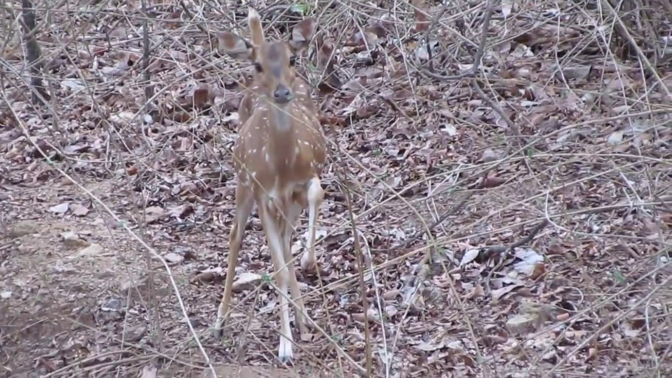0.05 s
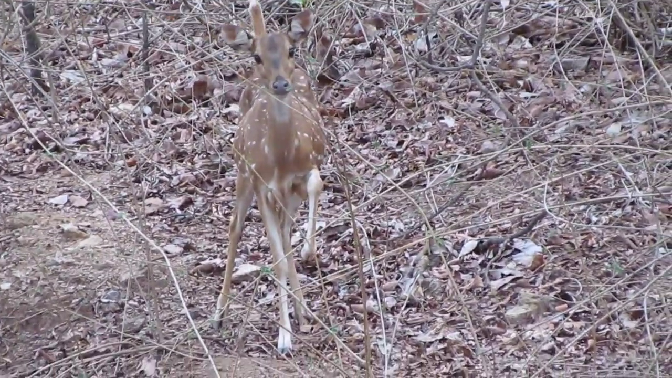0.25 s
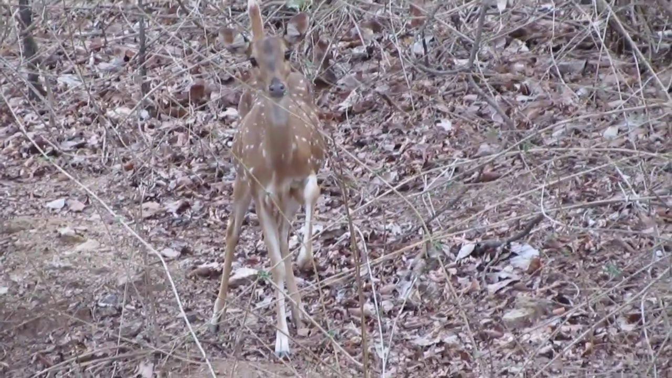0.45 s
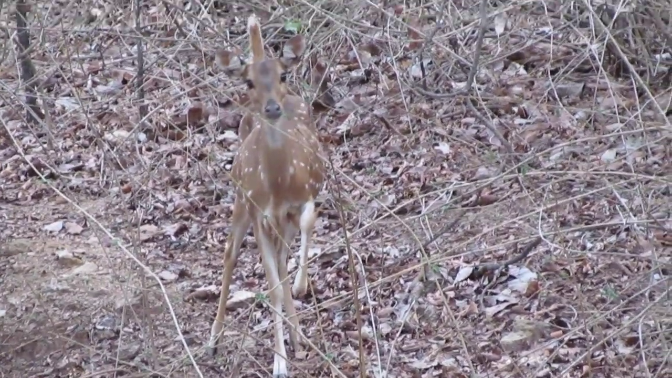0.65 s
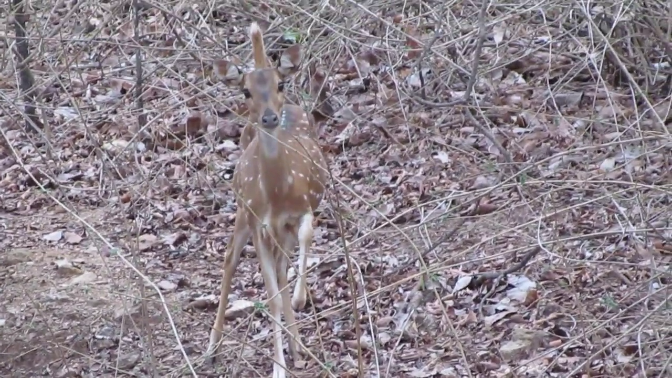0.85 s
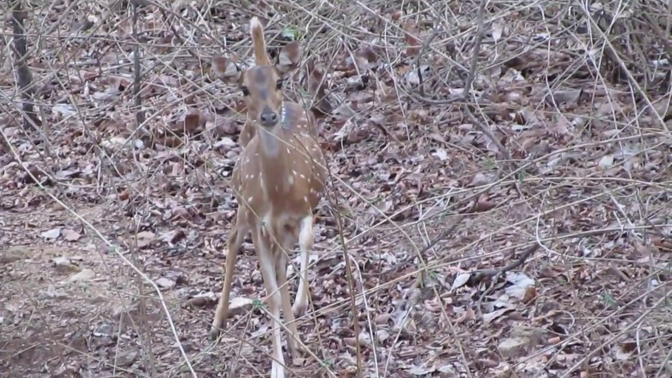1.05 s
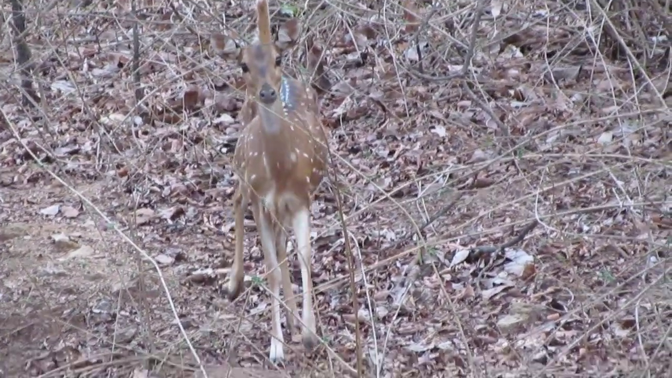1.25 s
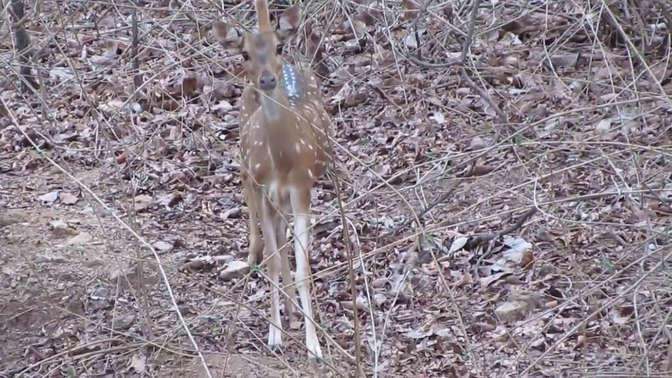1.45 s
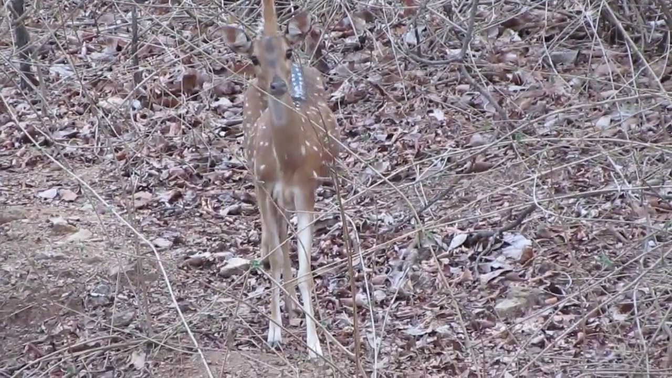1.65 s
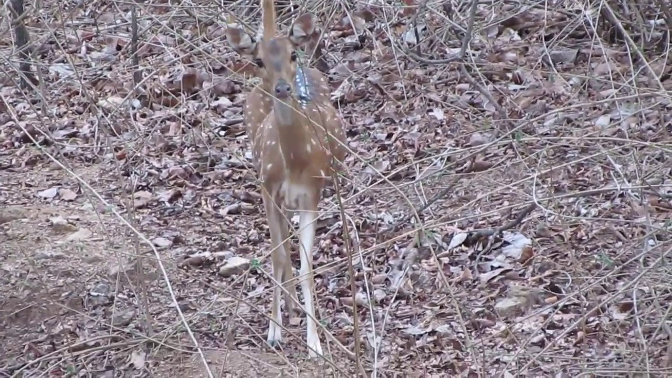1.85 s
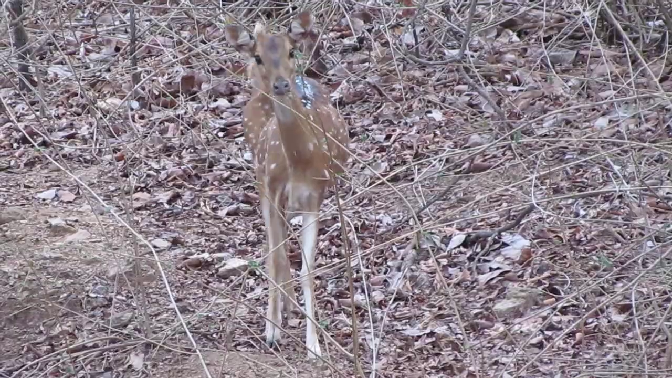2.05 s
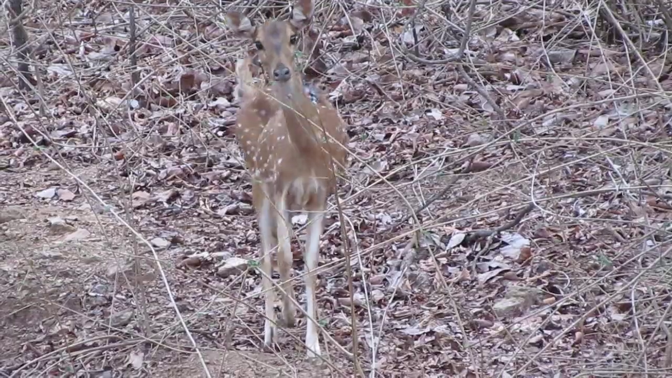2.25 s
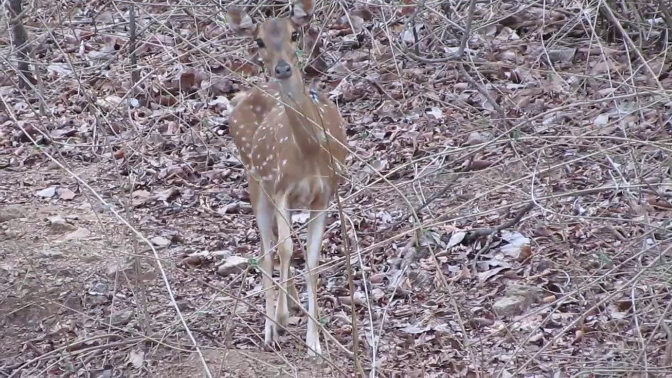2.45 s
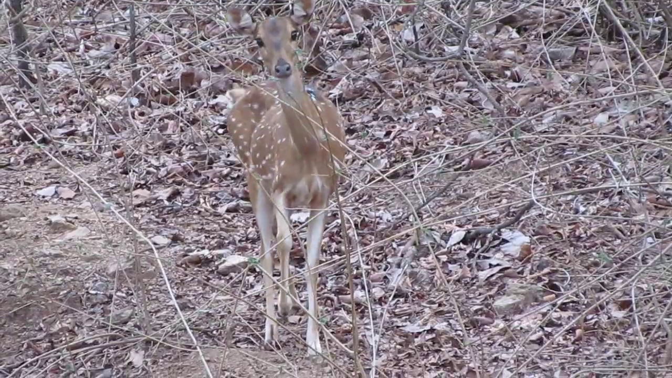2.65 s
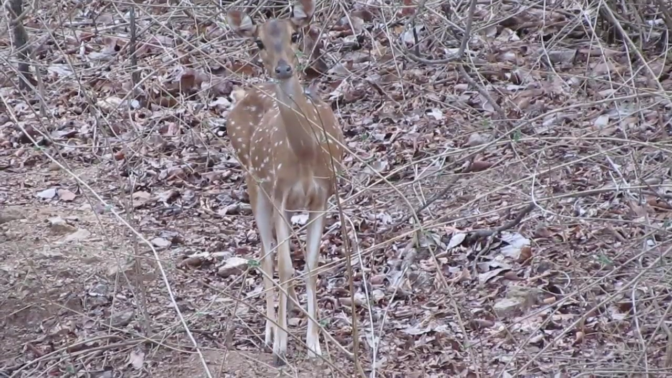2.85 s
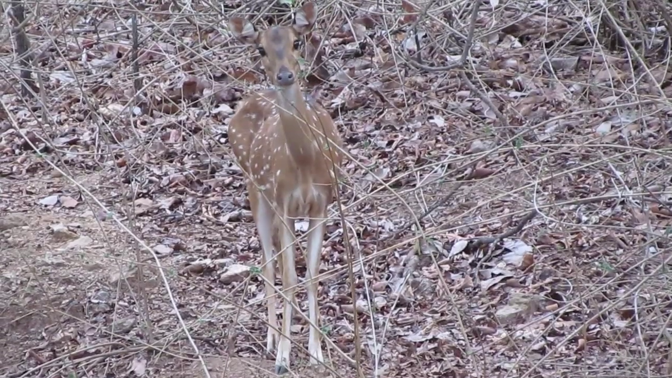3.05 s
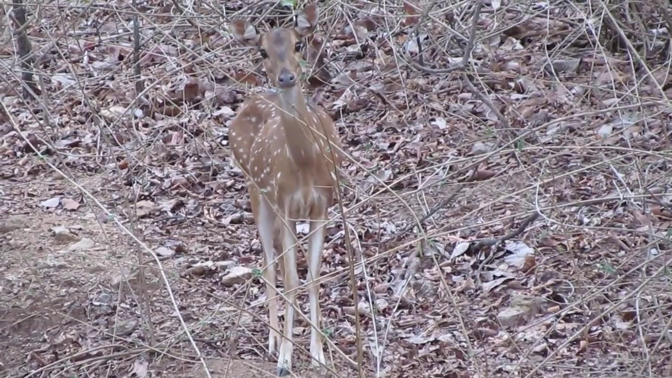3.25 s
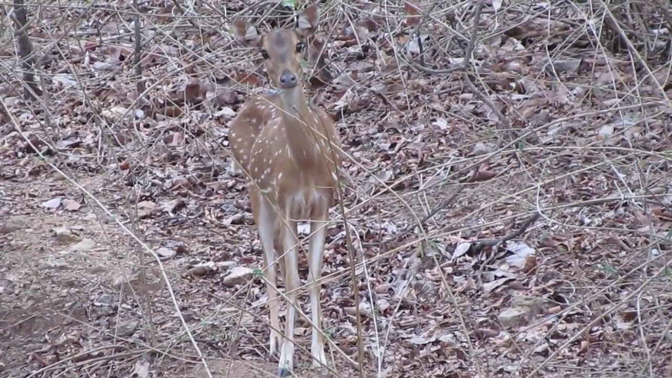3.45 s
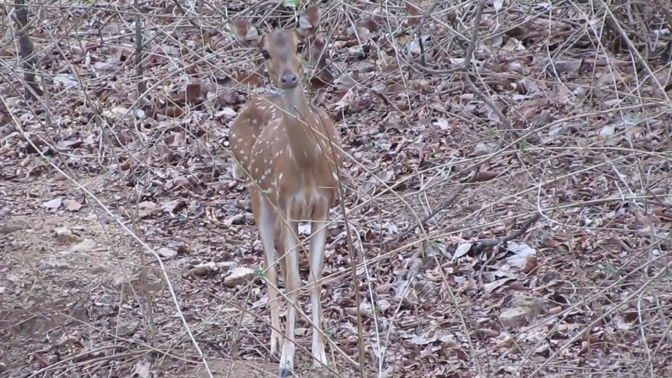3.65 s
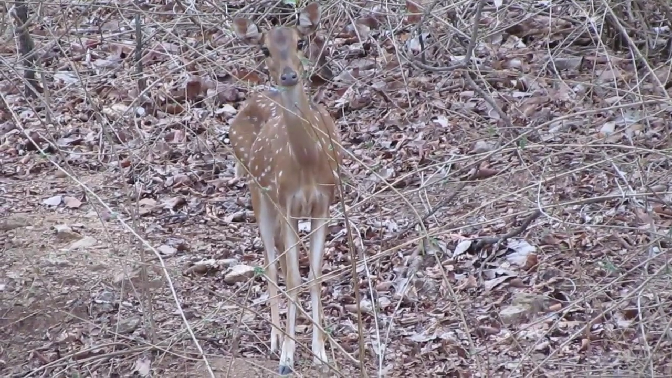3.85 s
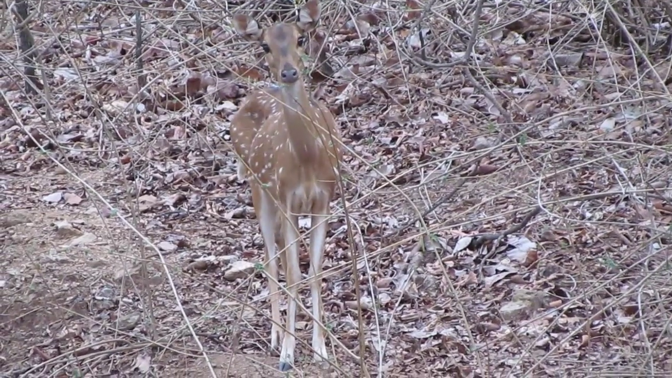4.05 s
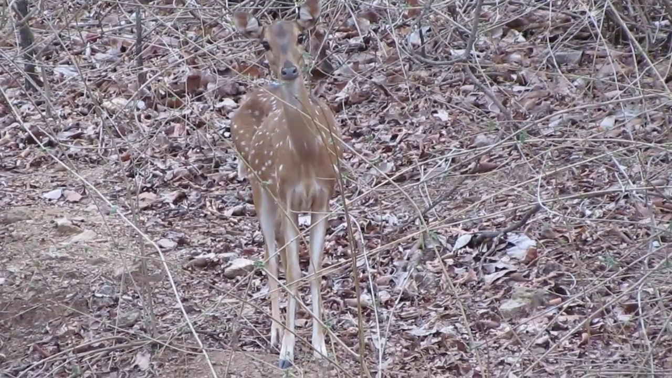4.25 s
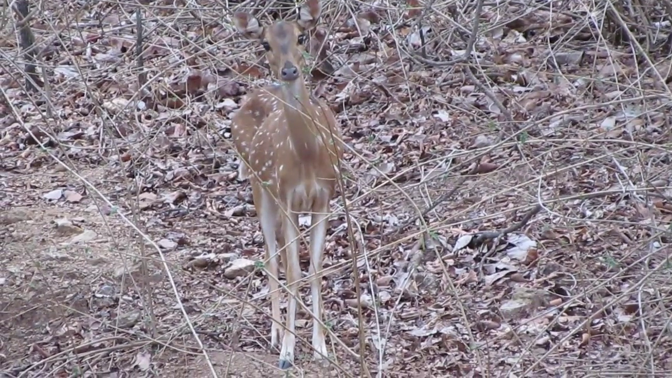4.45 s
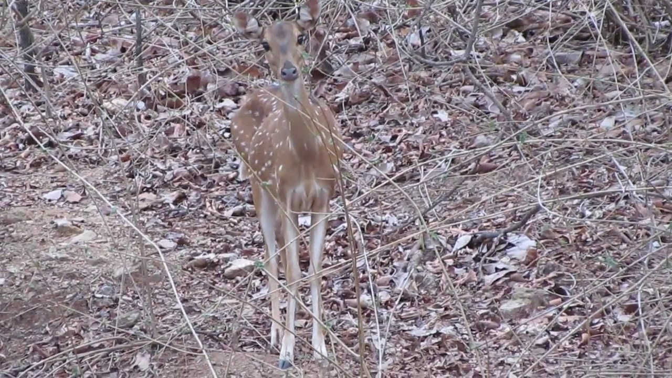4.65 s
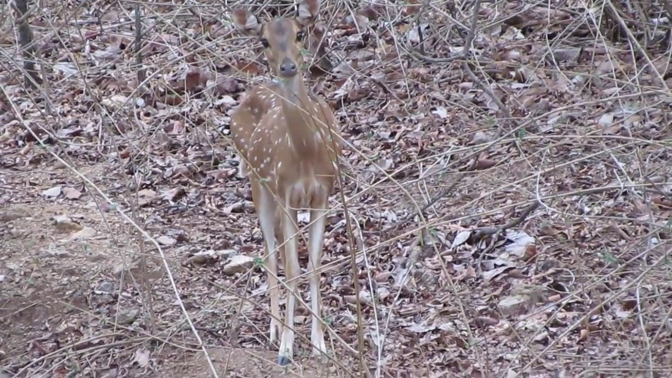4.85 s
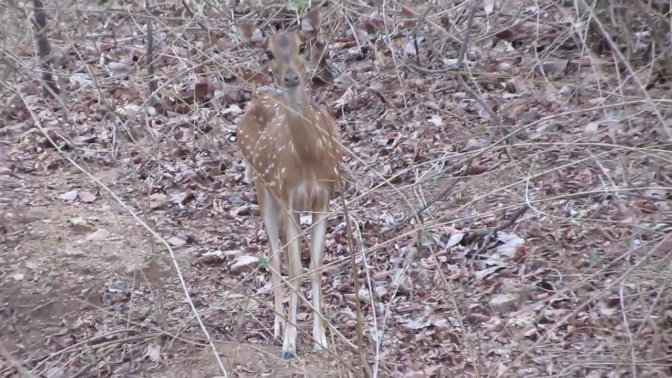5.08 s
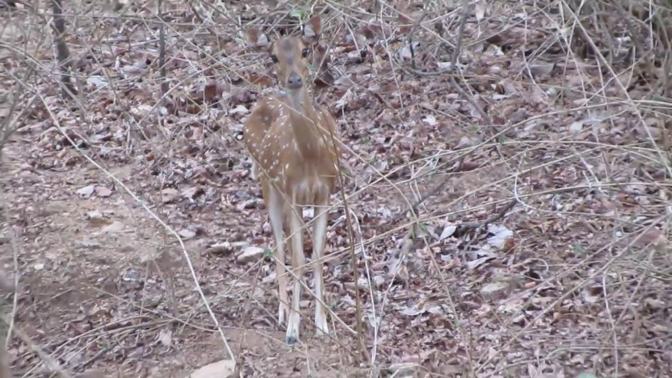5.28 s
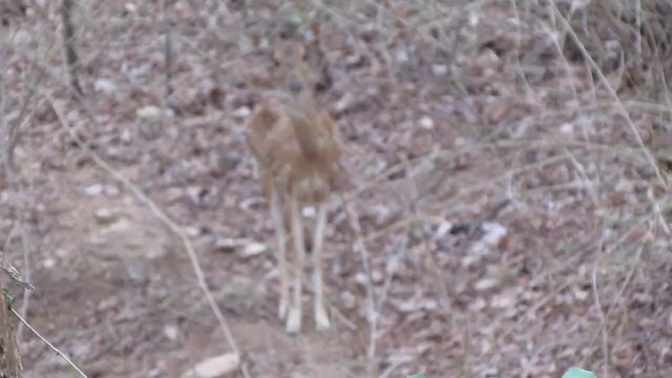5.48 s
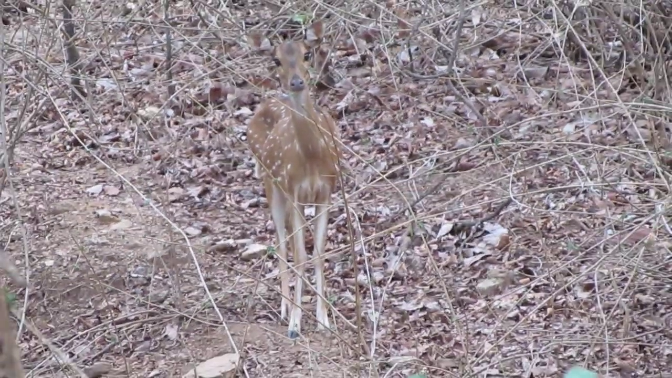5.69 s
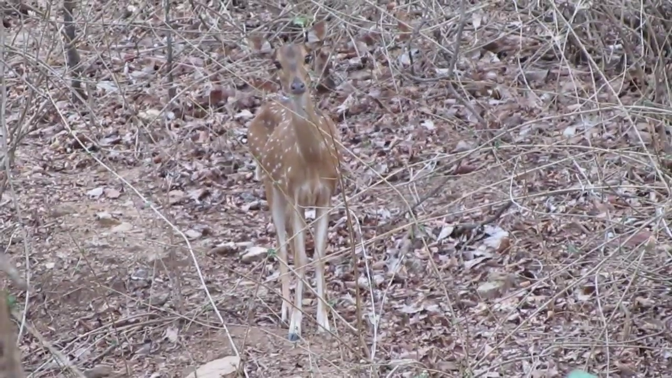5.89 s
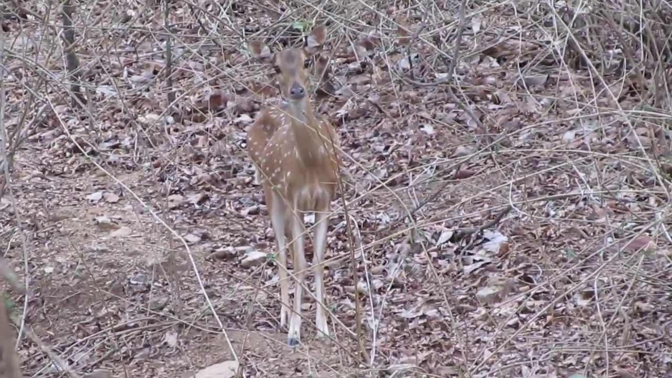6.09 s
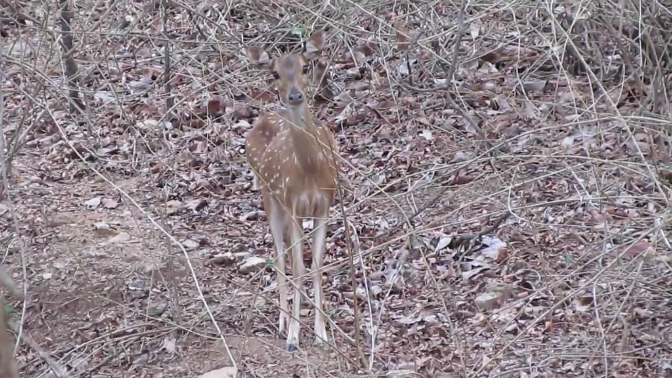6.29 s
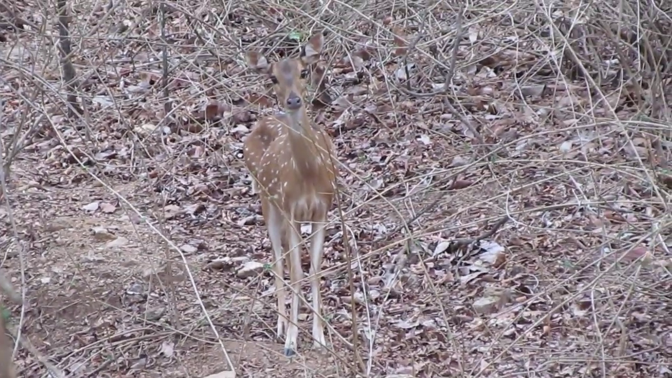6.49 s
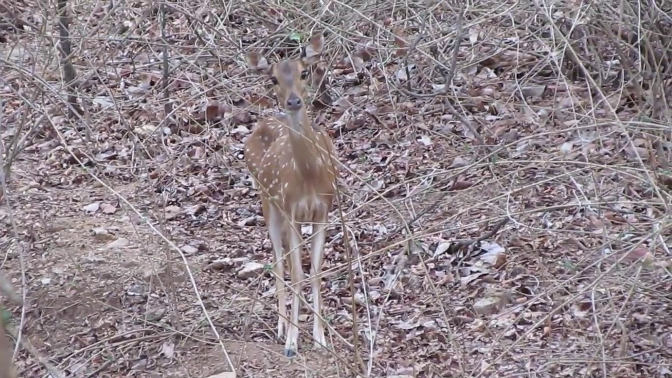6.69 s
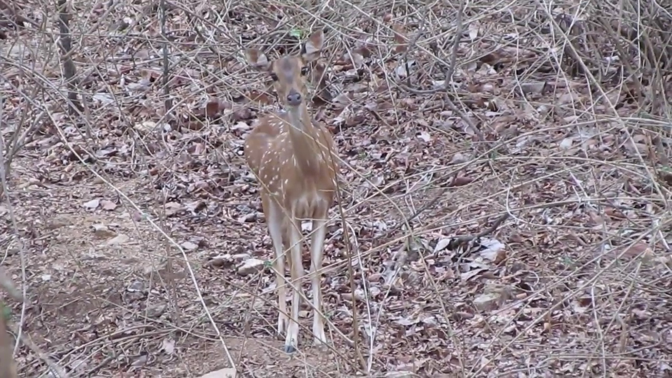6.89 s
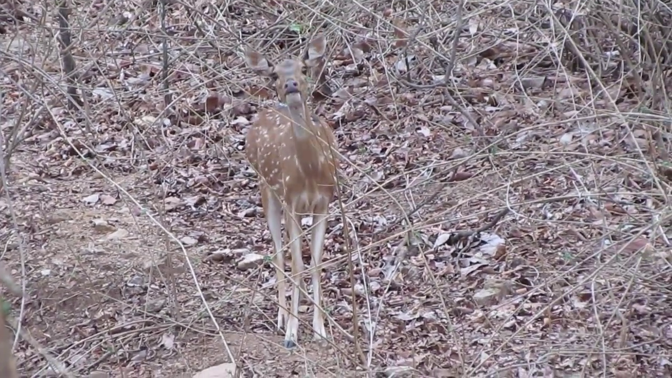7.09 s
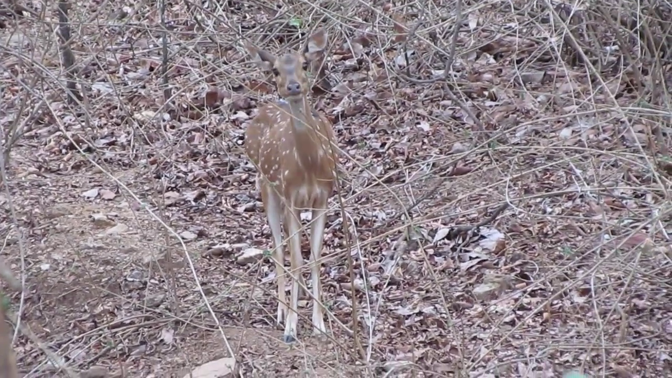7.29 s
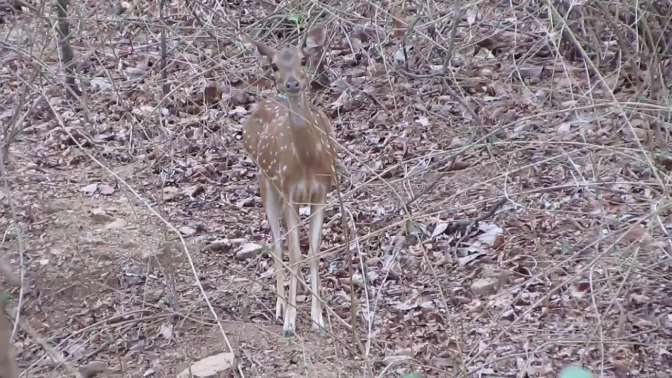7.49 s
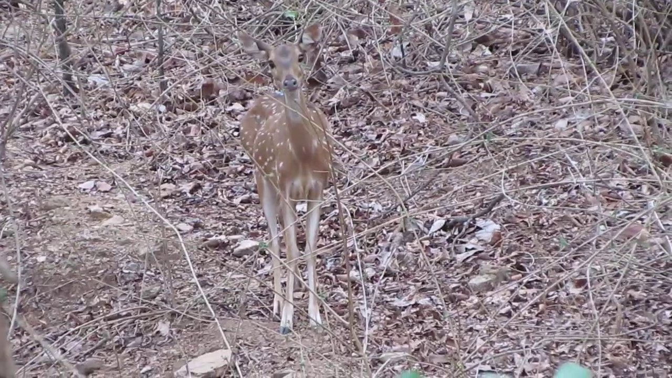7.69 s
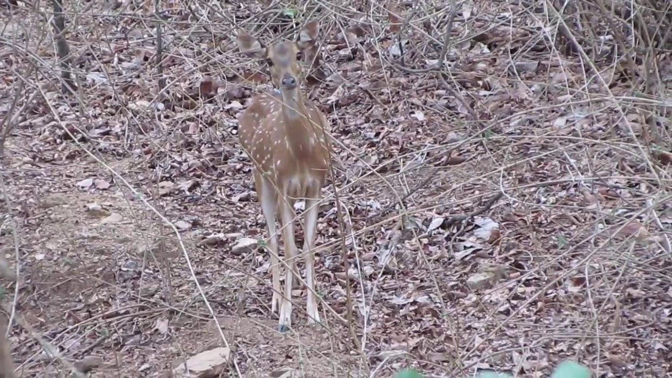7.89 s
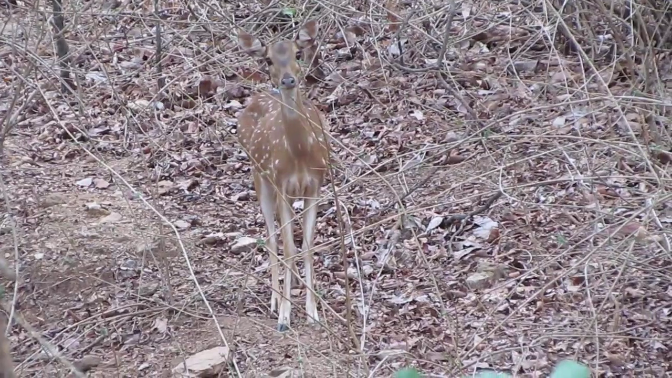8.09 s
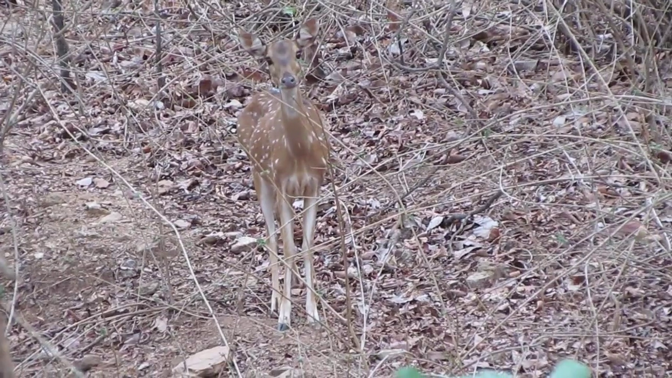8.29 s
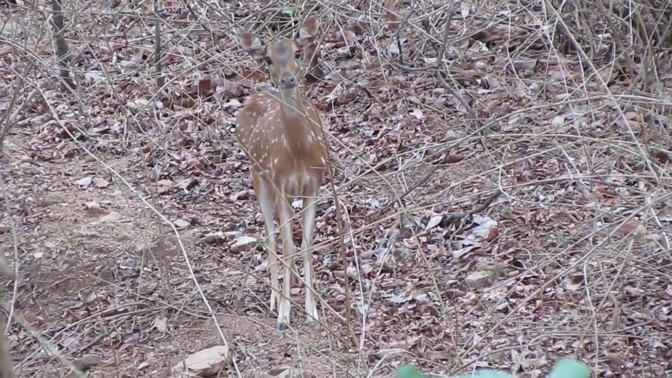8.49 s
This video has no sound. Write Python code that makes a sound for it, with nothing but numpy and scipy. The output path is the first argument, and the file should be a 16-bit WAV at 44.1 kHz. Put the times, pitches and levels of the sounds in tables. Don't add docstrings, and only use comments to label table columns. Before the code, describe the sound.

A spotted deer gives one sharp, high bark that rings through dry forest, over steady pulsing insect chirps, faint bird whistles and soft hiss.

```python
import sys
import numpy as np
from scipy import signal
from scipy.fft import rfft, irfft, next_fast_len
from scipy.io import wavfile

SR = 44100
rng = np.random.default_rng(int(sys.argv[2]) if len(sys.argv) > 2 else 0)


def waveform_to_disk(signal):
    frames = np.transpose(np.atleast_2d(signal))
    scaled = np.clip(frames, -1, 1) * 32767
    samples = np.round(scaled).astype(np.int16)
    wavfile.write(sys.argv[1], SR, samples)


def convert_level_to_amplitude(level_db):
    exponent = np.asarray(level_db, float) / 20
    return 10 ** exponent


N = 376173
TIME = np.arange(N) / SR
BARK_ONSET_S = 7.082
OPPOSITE = np.array([[1], [-1]])


def in_time(rows):
    s, *columns = np.transpose(rows)
    return [np.interp(TIME, s, c) for c in columns]


def at_hz(points, hz):
    table_hz, values = np.array(points).T
    return np.interp(np.log(hz), np.log(table_hz), values)


def rms_one(x):
    return x / np.sqrt(np.mean(x ** 2) + 1e-20)


def shaped(x, gain):
    length = x.shape[-1]
    size = next_fast_len(length)
    hz = np.arange(size // 2 + 1) * SR / size + 1
    return irfft(rfft(x, size) * gain(hz), size)[..., :length]


def coloured(points, channels=1):
    return rms_one(shaped(rng.standard_normal((channels, N)), lambda hz: convert_level_to_amplitude(at_hz(points, hz))))


def band(x, low_hz, high_hz):
    return signal.sosfilt(signal.butter(2, [low_hz, high_hz], "band", fs=SR, output="sos"), x + 1e-18)


def fluctuation(low_hz, high_hz):
    return rms_one(band(rng.standard_normal(N), low_hz, high_hz))


def swell(start, end, rise, fall):
    return np.clip((TIME - start) / rise, 0, 1) * np.clip((end - TIME) / fall, 0, 1)


def pan(x, db):
    return np.array([x * convert_level_to_amplitude(db / 2), x * convert_level_to_amplitude(-db / 2)])


def add(track, s, piece):
    at = int(s * SR)
    track[..., at:at + piece.shape[-1]] += piece[..., :N - at]


def vocal_folds():
    # time in seconds, fold pitch in Hz, effort in dB, mouth opening as lift of the 2nd partial in dB.
    bark = [
        (7.066, 1010, -41, -18),
        (7.08, 1100, -28.5, 3),
        (7.09, 1135, -28, 7.5),
        (7.128, 1130, -19.5, 2),
        (7.145, 1064, -23.5, -3),
        (7.170, 933.5, -24.5, -5.5),
        (7.195, 790, -33, -6.5),
        (7.215, 640, -64, -29),
    ]
    # multiple of the pitch, level in dB relative to the 2nd partial.
    upper_partials = [(3, -29), (4, -34), (5, -33), (6, -36), (10, -43)]
    hz, first_db, mouth_db = in_time(bark)
    second_db = first_db + mouth_db
    slack = np.clip((TIME - 7.13) / .03, 0, 1)
    shake = rms_one(band(rng.standard_normal((3, N)), 30, 153))
    phase = 2 * np.pi * np.cumsum(hz * (1 + .01 * slack * shake[0])) / SR
    flutter = 1 + .3 * slack * shake[1]
    wobble = .85 * slack * shake[2]
    first = convert_level_to_amplitude(first_db) * np.sin(phase)
    second = convert_level_to_amplitude(second_db) * np.sin(2 * phase - 0.8 + wobble)
    snap_db = 5.5 * np.exp(-np.maximum(TIME - BARK_ONSET_S, 0) / 0.0097)
    upper = convert_level_to_amplitude(second_db + snap_db) * sum(convert_level_to_amplitude(db) * np.sin(k * phase) for k, db in upper_partials)
    sounding = (TIME > bark[0][0]) & (TIME < bark[-1][0])
    return sounding * (flutter * (first + second) + upper), phase, shake[2]


def nasal_whistle(phase, shake):
    blown = np.maximum(TIME - BARK_ONSET_S, 0)
    hz = 8580 + 680 * np.exp(-blown / 0.026)
    level = convert_level_to_amplitude(-26.5 - 230 * blown) * swell(BARK_ONSET_S, 7.14, 0.0074, .012) ** 2
    high = 2 * np.pi * np.cumsum(hz + 56.0 * shake) / SR
    return level * (np.sin(high) + convert_level_to_amplitude(-7.0) * np.sin(high + phase) + convert_level_to_amplitude(-13) * np.sin(high - phase))


def breath_gain(low_hz):
    t = TIME - 0.0043 * np.log2(16000 / low_hz)
    falling_db = -42 - 450 * np.maximum(t - 7.155, 0)
    return convert_level_to_amplitude(falling_db) * np.clip((t - 7.068) / 0.014, 0, 1) ** 2


def breath(phase):
    # frequency in Hz, level in dB per Hz.
    breath_colour = [(500, -19), (1500, 0), (2000, 3), (3000, -3.5), (4800, -12), (5800, -2), (7500, -7),
                     (10500, 3.5), (12500, -6), (15000, -34)]
    patchy = 0
    for part, low_hz in zip(coloured(breath_colour, channels=7), 500 * 1.6 ** np.arange(7)):
        patches = convert_level_to_amplitude(2.5 * fluctuation(12, 40))
        patchy = patchy + breath_gain(low_hz) * patches * band(part, low_hz, 2.0 * low_hz)
    puffs = 1 + 0.51 * np.sin(phase)
    return patchy * puffs


def deer():
    folds, phase, shake = vocal_folds()
    return folds, nasal_whistle(phase, shake) + breath(phase)


def bark_at_ports(voice):
    # frequency in Hz, left-right difference in dB.
    bark_lean = [(700, -1), (1200, 1.5), (2260, -5.5), (4400, 1), (8100, -5.5)]
    lag_s = 1.3e-5

    def gain(hz):
        tilt = convert_level_to_amplitude(at_hz(bark_lean, hz) * OPPOSITE / 2)
        return tilt * np.exp(-1j * np.pi * hz * lag_s * OPPOSITE)
    return shaped(voice, gain)


def burst(length, hz):
    t = np.arange(int(length * SR)) / SR
    return np.hanning(len(t)) * np.sin(2 * np.pi * (hz * t + rng.random()))


def cicada():
    # start in seconds, last strong beat in seconds.
    chirps = [(0.151, 0.34), (0.688, 0.89), (1.227, 1.43), (1.766, 1.984), (2.342, 2.541), (2.839, 3.043),
              (3.353, 3.556), (3.899, 4.089), (4.391, 4.62), (4.912, 5.15), (5.462, 5.664), (6.033, 6.27),
              (6.616, 6.82), (7.188, 7.39), (7.723, 7.921), (8.243, 8.414)]
    # seconds after the strong beat, level in dB, length in seconds.
    beat_group = [
        (0.0, -1, .0045),
        (.0115, -4, .005),
        (.0190, -5.5, .005),
    ]
    chirp_db, pulse_gap_s, group_gap_s = -35, .0155, .0274
    plate_modes = ((4590, -9.5), (4750, -2.0), (5120, -9.0))   # (Hz, dB)
    out = np.zeros(N)
    for start, last in chirps:
        turn = last - 3 * group_gap_s
        for s in np.arange(start, turn - .011, pulse_gap_s):
            age = s - start
            pulse_db = chirp_db - 14 * np.exp(-age / 0.023) - 4
            main = burst(0.014, 4730 + rng.normal(0, 42.6))
            add(out, s - .003, convert_level_to_amplitude(pulse_db + rng.normal(0, 0.38)) * main)
            lower_mode = burst(.008, 4580 + rng.normal(0, 30))
            add(out, s, convert_level_to_amplitude(pulse_db - 7 + rng.normal(0, 1.5)) * lower_mode)
            click_db = pulse_db - 2.5 - 20 * max(1 - age / .06, 0) - 3
            click = burst(.006, 5050 + rng.normal(0, 60))
            add(out, s + .002, convert_level_to_amplitude(click_db + rng.normal(0, 1.5)) * click)
        for s in turn + group_gap_s * np.arange(4):
            beats = 2 if s > last - .01 else 3
            for after, beat_db, length in beat_group[:beats]:
                for hz, mode_db in plate_modes:
                    level = convert_level_to_amplitude(chirp_db + beat_db + mode_db + rng.normal(0, 1.7))
                    add(out, s + after - length, level * burst(2 * length, hz + rng.normal(0, 67.8)))
    return out


def birds():
    # start in seconds, length in seconds, start pitch in Hz, level in dB.
    held = [(1.258, 0.073, 2605, -51), (1.26, .027, 3160, -40), (1.272, 0.086, 2956, -37),
            (1.73, 0.042, 2362, -50), (1.875, .045, 2930, -42), (1.915, .035, 3030, -45),
            (2.84, .12, 2340, -60), (3.388, .03, 1630, -59), (2.09, 0.057, 1892, -50),
            (2.336, 0.049, 2310, -52.5), (2.889, 0.15, 1770, -43), (3.988, 0.047, 2980, -61),
            (4.61, 0.06, 2580, -57), (4.7, 0.055, 2633, -61), (4.833, 0.062, 2660, -56),
            (5.0, 0.066, 2812, -56.5), (6.9, 0.08, 2852, -45.5), (6.97, .06, 2956, -48.5),
            (7.112, 0.054, 2923, -35), (7.198, .039, 2910, -42), (7.461, 0.091, 1764, -41),
            (7.613, 0.03, 2664, -37.5), (8.003, .018, 2625, -34)]
    falling = [(.77, 0.053, 2530, -58), (1.034, 0.095, 1783, -57), (1.887, 0.037, 2400, -42.5),
               (2.177, 0.067, 2235, -46.5), (2.227, 0.047, 1759, -49.5), (2.281, 0.039, 2080, -48),
               (3.3, .05, 2250, -54.5), (4.455, 0.05, 2827, -56), (5.24, .05, 4020, -59),
               (6.13, .04, 3470, -58), (7.39, 0.054, 2534, -40), (8.038, 0.059, 2408, -37),
               (8.087, 0.056, 2234, -50)]
    churred = [(1.465, .05, 2030, -46), (1.483, 0.057, 2200, -42.5), (1.526, .09, 2250, -41),
               (1.783, 0.062, 2250, -46), (2.879, .052, 3020, -57), (6.0, 0.047, 2950, -60),
               (3.121, 0.034, 2660, -58), (7.315, 0.0548, 2260, -39), (7.382, 0.062, 3000, -50.5),
               (7.591, .042, 2950, -52), (7.842, 0.048, 2330, -39), (7.939, 0.047, 1800, -45)]
    flicked = [
        (1.249, .026, 2480, -47),
        (4.49, .012, 2750, -53),
        (6.878, 0.023, 2370, -50),
        (7.815, 0.05, 1048, -48),
    ]
    # (notes, glide in Hz per second, huskiness 0-1)
    kinds = ((held, -250, .07), (falling, -2800, 0.15), (churred, 3600, .5), (flicked, 34000, .25))
    out, waver = np.zeros(N), fluctuation(19.8, 230)
    for notes, glide, husky in kinds:
        for s, length, start_hz, db in notes:
            count, at = int(length * SR), int(s * SR)
            hz = start_hz + glide * TIME[:count] + 287.0 * husky * waver[at:at + count]
            whistle = np.sin(2 * np.pi * np.cumsum(hz) / SR)
            add(out, s, convert_level_to_amplitude(db) * signal.windows.tukey(count, .6) * whistle)
    return out


def forest(x, near_db, near_t60, far_db, alike, far_alike, rise):
    # frequency in Hz, decay by 60 dB in seconds.
    decay = [(500, 2.3), (1100, 2.5), (2300, 1.7), (4800, 1.6), (9000, 0.25), (14000, 0.23)]
    t, far = np.arange(int(1.8 * SR)) / SR, 0
    mid, side, other_mid, other_side = rng.standard_normal((4, len(t)))

    def stereo(common, different, likeness):
        likeness = np.clip(likeness, 0, 1)
        return np.sqrt(.5 + .5 * likeness) * common + np.sqrt(.5 - .5 * likeness) * different * OPPOSITE
    white = stereo(mid, side, far_alike)
    for low_hz in 300 * 2 ** np.arange(0, 5.5, .5):
        t60 = at_hz(decay, low_hz * 2 ** .25)
        far = far + band(white, low_hz, low_hz * np.sqrt(2)) * convert_level_to_amplitude(-60 * t / t60) / np.sqrt(t60 * SR)
    near = stereo(other_mid, other_side, alike) * convert_level_to_amplitude(-60 * t / near_t60) / np.sqrt(near_t60 * SR)
    echo = convert_level_to_amplitude(near_db) * near * np.clip(t / rise, 0, 1) + convert_level_to_amplitude(far_db) * far * np.clip(t / 0.16, 0, 1)
    first = np.flatnonzero(x)[0]
    wet = signal.fftconvolve(x[None, first:], echo, axes=1)[:, :N - first]
    return np.pad(wet, ((0, 0), (first, 0)))


def buzz(per_s, hz, glide_hz, rough):
    strokes = np.cumsum(per_s + 2.8 * fluctuation(14.0, 30)) / SR % 1
    tone = np.sin(2 * np.pi * np.cumsum(hz + glide_hz * (strokes - .5)) / SR) * np.sin(np.pi * strokes) ** 2
    uneven = 1 + rough * fluctuation(40, 270)
    return rms_one(rms_one(tone * uneven) + .5 * fluctuation(hz - 350, hz + 350))


def high_insect():
    # time in seconds, throbs counted so far.
    throb = [
        (1.084, 0),
        (3.022, 16),
        (3.994, 24),
        (5.492, 36),
        (6.536, 44),
        (6.971, 47),
    ]
    throbs, = in_time(throb)
    level = convert_level_to_amplitude(-61) * swell(.7, 7.13, 0.86, 0.56) + convert_level_to_amplitude(-69) * swell(8, 10, .6, 1)
    throbbing = (TIME > throb[0][0]) & (TIME < throb[-1][0])
    pulse = .5 + .5 * np.tanh(1.8 * (np.cos(2 * np.pi * throbs - .5) + .45))
    gate = np.where(throbbing, pulse, .7)
    return pan(level * gate * buzz(124, 8930, glide_hz=1250.0, rough=0.3), -6.5)


def middle_insect():
    # start in seconds, end in seconds.
    buzzes = [(-.5, .11), (.60, 1.36), (1.78, 2.48), (2.974, 3.73), (4.20, 4.76), (5.40, 6.055),
              (6.65, 7.4), (8.02, 9.3)]
    level = sum(convert_level_to_amplitude(-69 - 2.9 * (end - TIME)) * swell(s, end, .08, .019) for s, end in buzzes)
    return pan(level * buzz(156, 7280, glide_hz=400.0, rough=0.89), -1.8)


def case_taps():
    # time in seconds, peak in dB, left-right in dB, rattle decay by 60 dB in seconds, dull share in dB.
    taps = [
        (4.845, -32.5, 4.5, 0.083, -0.5),
        (5.215, -39.5, -2, 0.049, -2),
        (5.253, -38.5, -2.0, .04, -11),
        (5.428, -26, 5, 0.02, -5),
        (5.563, -42, 3, 0.032, 1),
        (5.589, -25, 4.5, 0.092, -7.5),
        (5.706, -46, .5, 0.025, -12),
    ]
    # resonance in Hz, width in Hz, level in dB.
    case_modes = [(264, 85, 1.5), (490, 190, 3), (1116, 390, -2), (1776, 290, -3), (2360, 390, -7.5),
                  (3500, 730, -12.5), (5970, 3000, -10), (10000, 3300, -17)]
    out, t = np.zeros((2, N)), np.arange(int(.08 * SR)) / SR
    for s, db, pan_db, t60, dull_db in taps:
        rattle = np.clip(t / .0007, 0, 1) * convert_level_to_amplitude(-60 * t / t60) * rng.standard_normal(len(t))
        ring = 0
        for hz, width_hz, mode_db in case_modes:
            mode = band(rattle * convert_level_to_amplitude(-.3 * hz * t), hz - width_hz / 2, hz + width_hz / 2)
            ring = ring + convert_level_to_amplitude(mode_db + dull_db * (hz < 700)) * rms_one(mode)
        add(out, s, pan(convert_level_to_amplitude(db) * ring / np.abs(ring).max(), pan_db))
    return out


def leaf_ticks():
    # time in seconds, peak in dB, left-right in dB.
    ticks = [(1.063, -79, -2.5), (1.4411, -38, -5.5), (1.5658, -47, 0), (1.8422, -41, -9),
             (2.3057, -59.5, 0), (4.5416, -41, -6.5), (5.6131, -47, -12), (6.4577, -46, -6),
             (7.7759, -56, 6)]
    out, t = np.zeros((2, N)), np.arange(int(.08 * SR)) / SR
    for s, db, pan_db in ticks:
        crack = band(rng.standard_normal(len(t)), 8400, 12000)
        add(out, s, pan(convert_level_to_amplitude(db - 3 - 60 * t / 0.031) * crack, pan_db))
    return out


def finger_rubs():
    # start in seconds, end in seconds, level in dB.
    strokes = [
        (4.9, 5.23, -53),
        (5.198, 5.492, -48),
        (5.4, 5.78, -59.5),
    ]
    # frequency in Hz, level in dB per Hz.
    rub_colour = [(120, -4), (300, 5.5), (500, 7), (900, -0.5), (1800, -1), (3200, -5.5), (5000, -2),
                  (6000, -6), (7000, -8), (8200, -10), (11000, -11), (15000, -28)]
    grain = convert_level_to_amplitude(1.77 * fluctuation(20, 120))
    level = sum(convert_level_to_amplitude(db) * swell(s, end, 0.07, 0.093) for s, end, db in strokes)
    return level * grain * coloured(rub_colour, channels=2)


def chorus():
    patches = convert_level_to_amplitude(3.6 * fluctuation(2, 12))
    singing = 1 - swell(5.4, 6.9, .2, .05)
    return convert_level_to_amplitude(-68.5) * singing * patches * rms_one(band(rng.standard_normal((2, N)), 1900, 3050))


def wind():
    # time in seconds, level in dB.
    gust_peaks = [(0.0, -57), (.36, -60), (.85, -53.5), (1.06, -59), (2.55, -60.5), (2.82, -60),
                  (3.54, -59.5), (4.28, -46), (4.7, -58), (5.27, -58), (5.75, -57), (6.3, -59), (7.13, -56),
                  (7.6, -63)]
    # time in seconds, peak in dB, pitch in Hz.
    bumps = [
        (0.849, -62, 88),
        (4.215, -35, 77.6),
        (4.309, -36, 57.6),
        (5.759, -49, 37.7),
    ]
    lumps = rms_one(band(rng.standard_normal((2, N)), 22, 95))
    gusts = convert_level_to_amplitude(-67) + sum(convert_level_to_amplitude(db) * np.exp(-np.abs(TIME - s) / 0.062) for s, db in gust_peaks)
    out = convert_level_to_amplitude(3.0) * gusts * lumps
    for s, db, hz in bumps:
        t = np.arange(int(2 * SR / hz)) / SR
        add(out, s, convert_level_to_amplitude(db + 5.0) * np.hanning(len(t)) * np.sin(2 * np.pi * hz * t) * [[1], [.4]])
    return out * convert_level_to_amplitude([[3.5], [-3.5]])


def air():
    # frequency in Hz, level in dB per Hz.
    hiss_colour = [(15, -30), (25, 3), (59, -2), (160, -0.5), (379, -6.5), (632, -9), (1270, -14.5),
                   (2240, -14), (4160, -20.5), (4760, -19.5), (5440, -19), (7720, -24.5), (8840, -15),
                   (9840, -25), (15600, -34.5)]
    # frequency in Hz, left-right likeness from 0 to 1.
    likeness = [(60, 0.033), (300, 0.29), (1000, 0.26), (4000, 0.12), (12000, 0.022)]
    # frequency in Hz, left-right difference in dB.
    lean = [(60, 0.5), (200, 2), (700, 1.5), (2400, 0.5), (4400, 2), (8000, -0.5), (15000, -1)]
    mid, side = coloured(hiss_colour, channels=2)
    mid = shaped(mid, lambda hz: np.sqrt(.5 + .5 * np.clip(at_hz(likeness, hz), 0, 1)))
    side = shaped(side, lambda hz: np.sqrt(.5 - .5 * np.clip(at_hz(likeness, hz), 0, 1)))
    left = shaped(mid + side, lambda hz: convert_level_to_amplitude(at_hz(lean, hz) / 2))
    right = shaped(mid - side, lambda hz: convert_level_to_amplitude(-at_hz(lean, hz) / 2))
    return convert_level_to_amplitude(-54 + 3.0) * np.array([left, right])


def scene():
    folds, high = deer()
    voice = folds + forest(folds, near_db=10.5, near_t60=0.45, far_db=8.5, alike=0.92, far_alike=.7, rise=0.031)
    voice = voice + high
    voice = voice + forest(high, near_db=4.0, near_t60=0.19, far_db=-8.0, alike=.2, far_alike=.2, rise=.004)
    chirps = cicada()
    insect = pan(chirps, 3.4)
    insect += forest(chirps, near_db=10.0, near_t60=.33, far_db=1.5, alike=0.22, far_alike=.3, rise=0.0057)
    notes = birds()
    song = pan(notes, -0.61)
    song += forest(notes, near_db=12.0, near_t60=0.49, far_db=18.0, alike=0.13, far_alike=.17, rise=0.0061)
    far_insects = high_insect() + middle_insect()
    handling = case_taps() + leaf_ticks() + finger_rubs()
    return bark_at_ports(voice) + insect + song + far_insects + handling + chorus() + wind() + air()


def top_cut(x):
    return signal.sosfilt(signal.butter(12, 15700, fs=SR, output="sos"), x)


def record(dry):
    mix = signal.sosfilt(signal.cheby2(12, 70, 16800, fs=SR, output="sos"), dry)
    return top_cut(mix)


dry = scene()
out = record(dry)
waveform_to_disk(out)
```